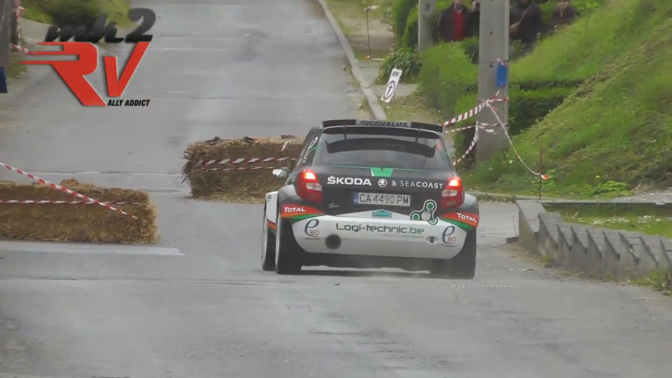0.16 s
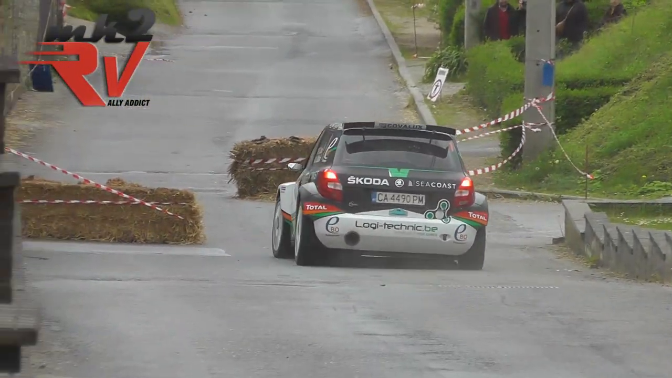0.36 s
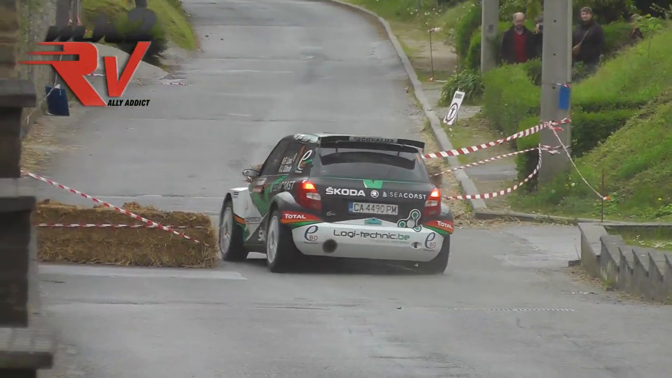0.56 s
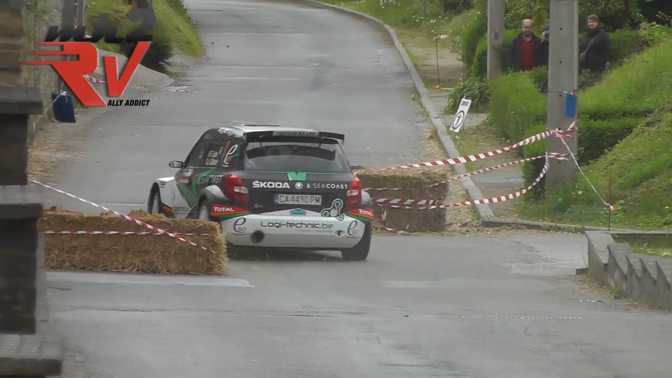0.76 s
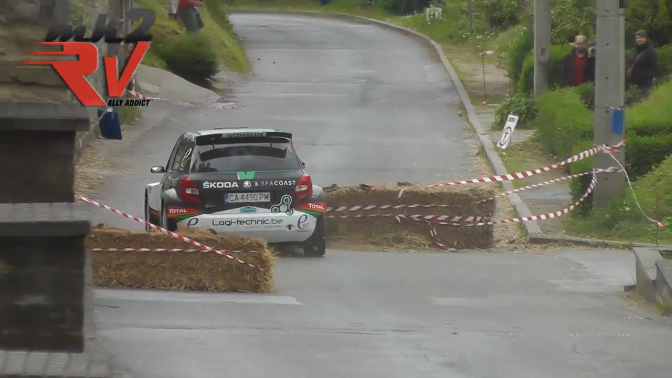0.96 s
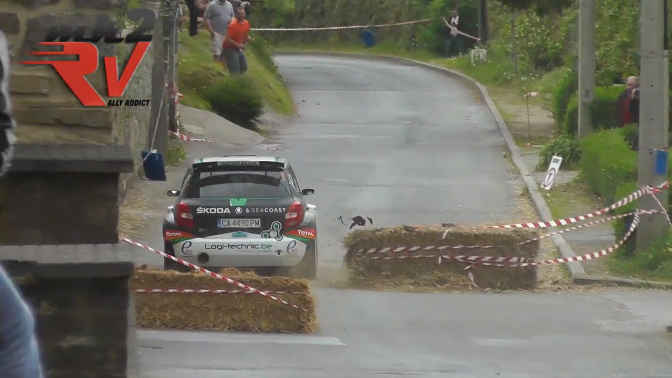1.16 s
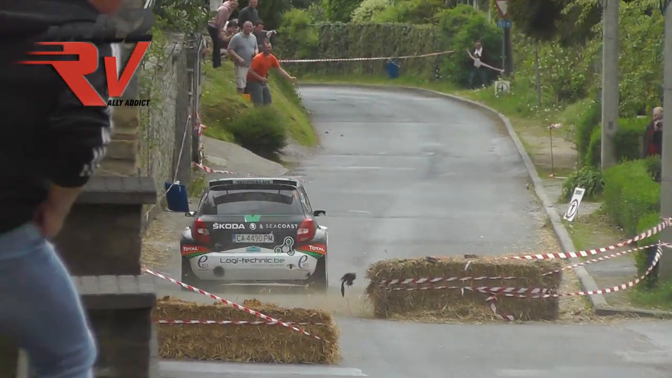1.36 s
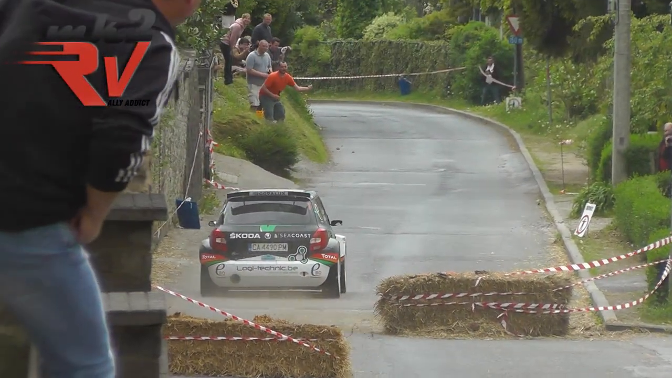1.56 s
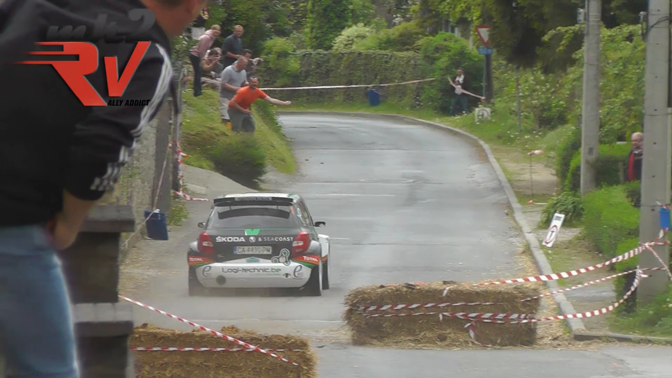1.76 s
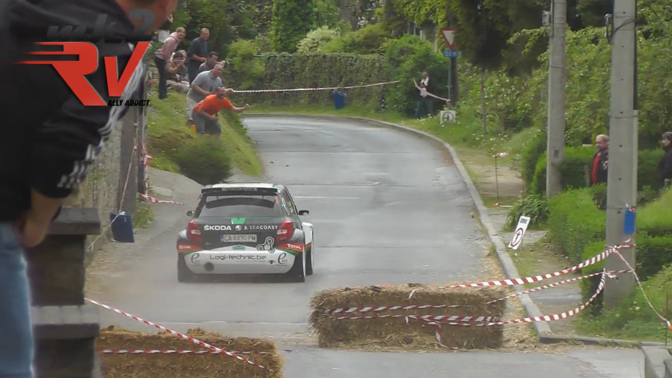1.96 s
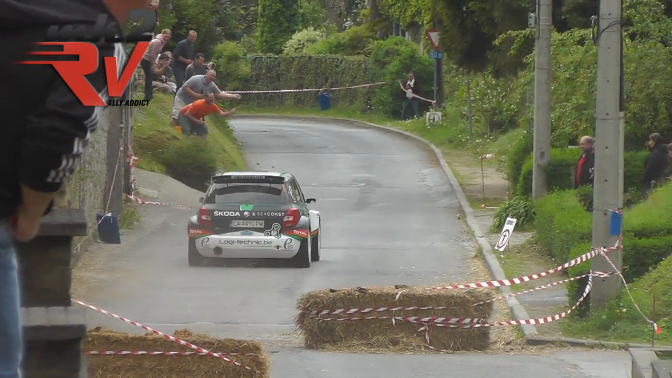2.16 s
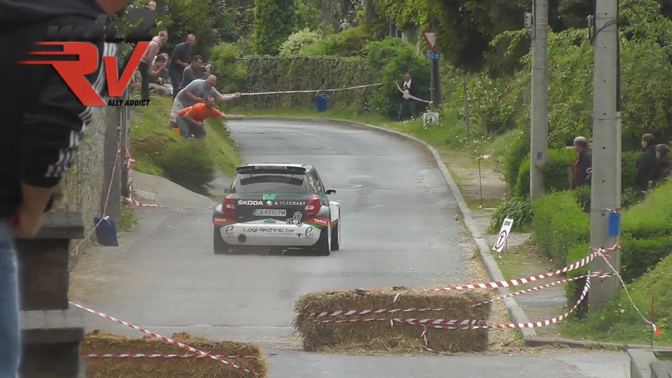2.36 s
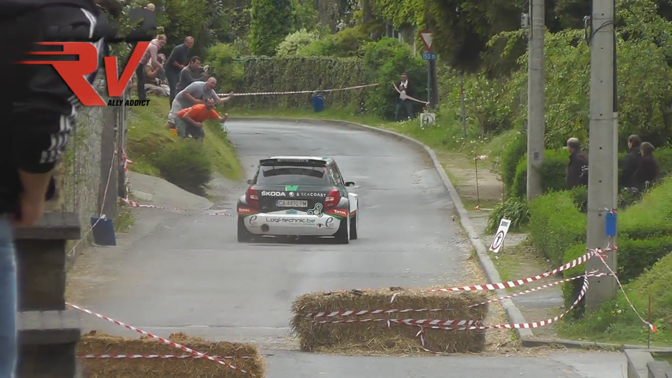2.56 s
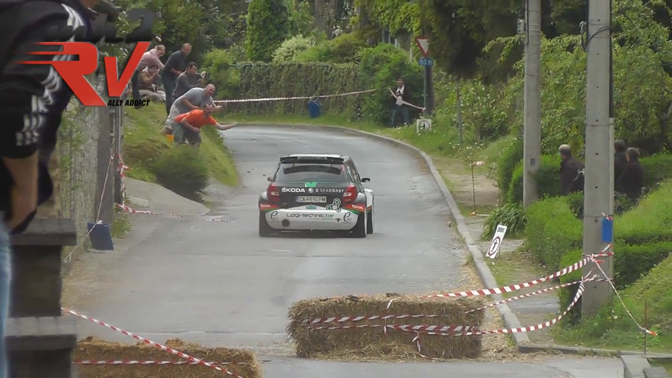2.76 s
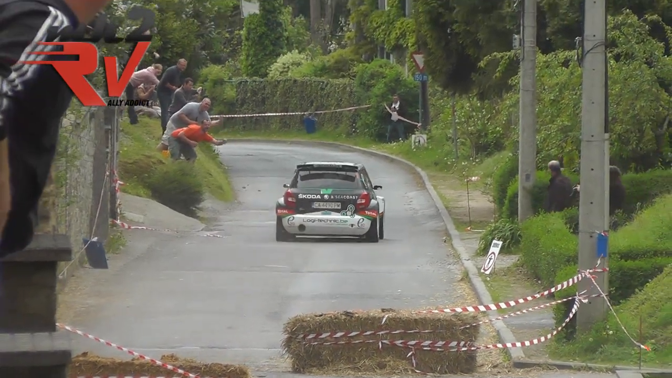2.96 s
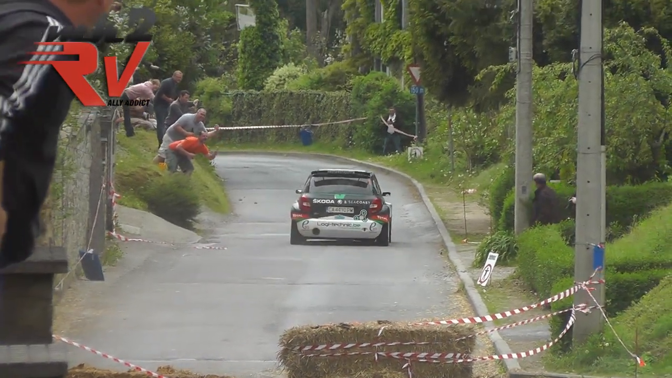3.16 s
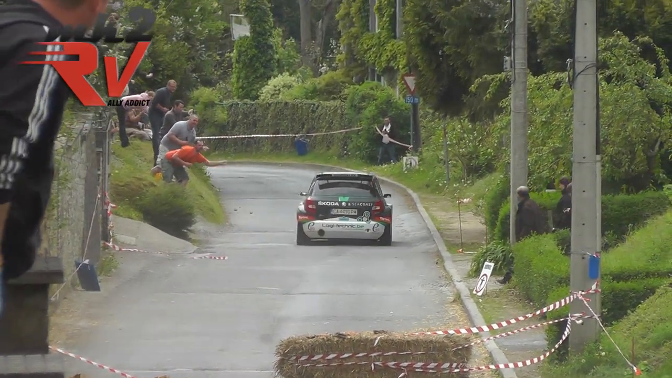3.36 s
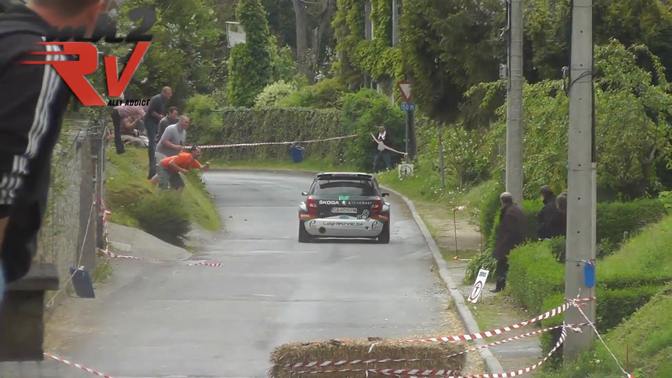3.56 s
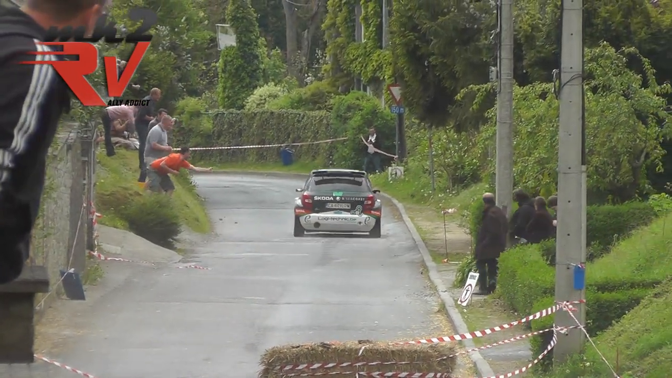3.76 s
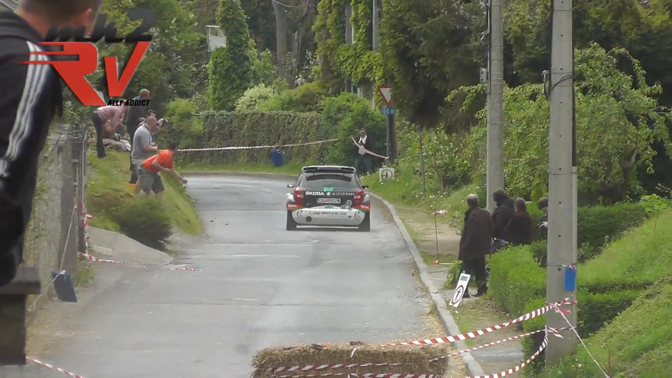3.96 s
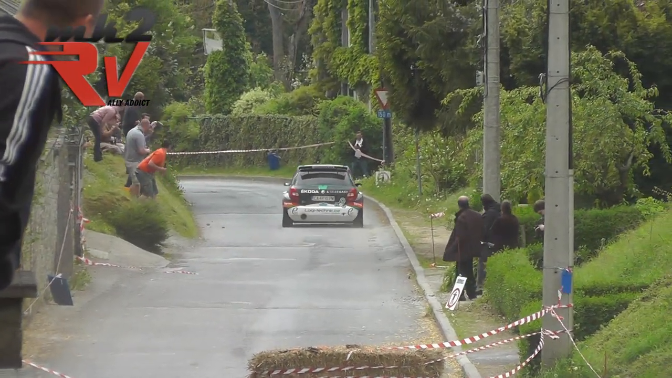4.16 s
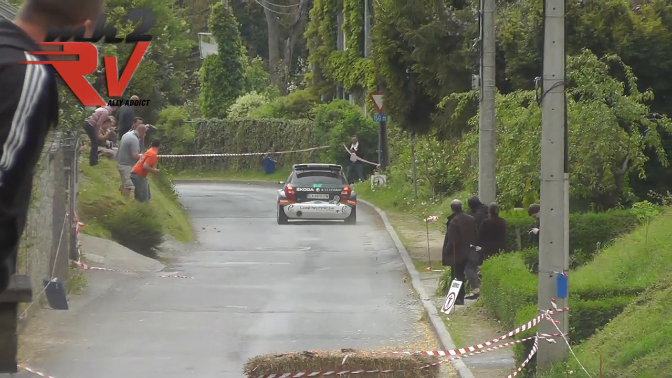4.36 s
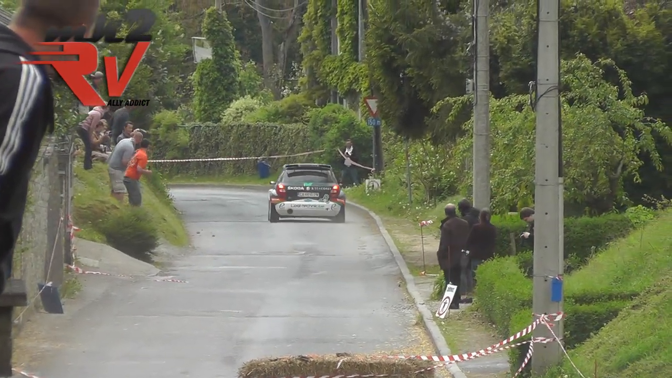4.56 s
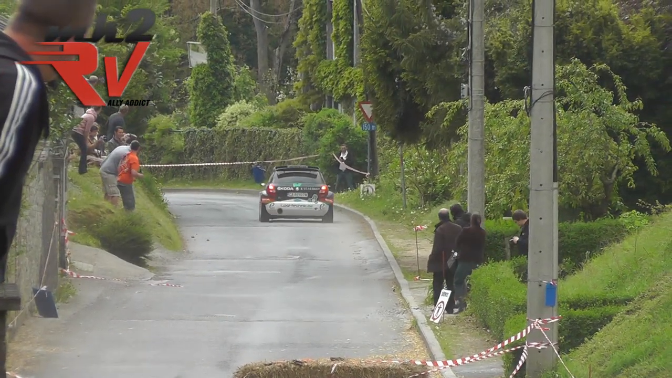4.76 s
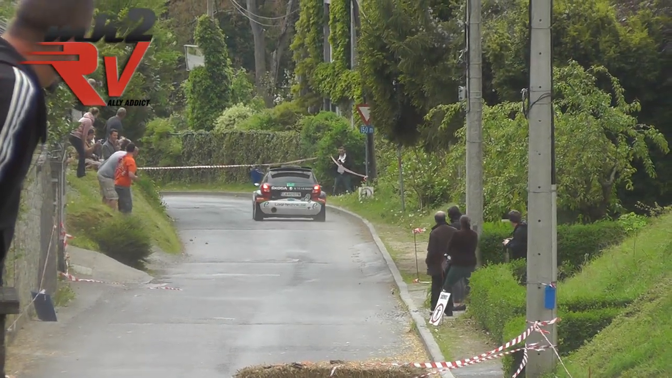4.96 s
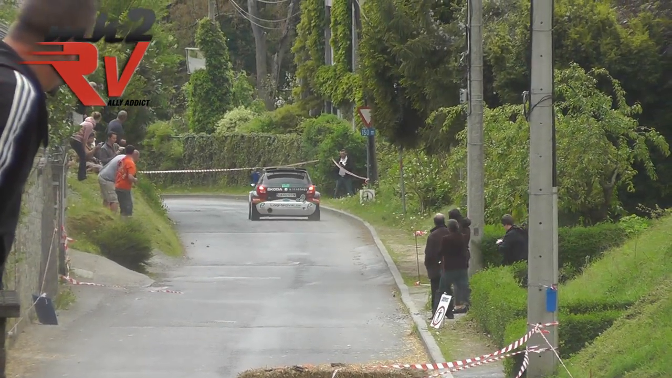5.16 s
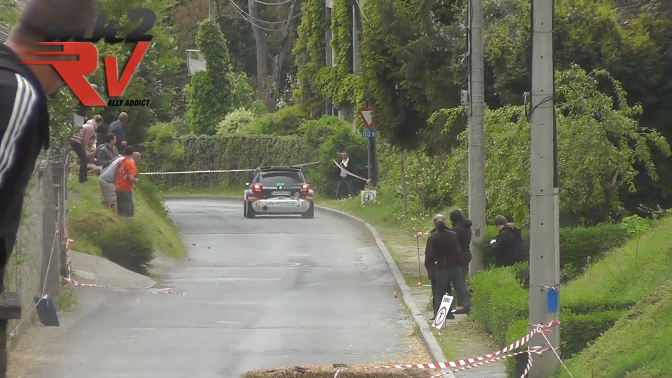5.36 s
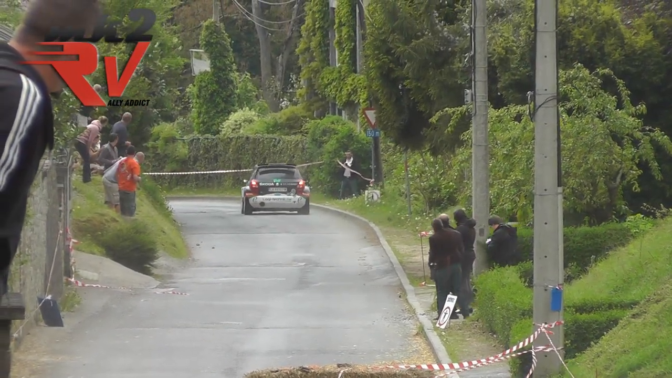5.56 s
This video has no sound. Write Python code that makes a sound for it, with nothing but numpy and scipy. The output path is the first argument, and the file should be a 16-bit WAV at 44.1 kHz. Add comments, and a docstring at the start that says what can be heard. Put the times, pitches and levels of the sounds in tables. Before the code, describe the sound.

Loud, buzzing four-cylinder exhaust, heard outdoors from the roadside in close stereo. First uneven, burbling notes with deep pops as the car weaves between barriers, then a hard stuttering pull. The tone rises smoothly, breaks in a cluster of bangs at a gear change, drops and rises again. Another popping shift follows, then it fades at the end with a sagging pitch. Faint wind rumble and short scattered reflections surround it.

```python
"""A four-cylinder rally car threads a chicane and drives off up a lane at full throttle, heard from the roadside.
Sines at the firing orders make the exhaust note; noise puffed once a firing makes the rough roar.
Tabled ignition cuts stutter both; struck pipe modes and gas bursts make thumps and cracks.
Random sparse echoes stand for walls and banks; grit ticks underneath and wind buffets the microphone."""
import sys
import numpy as np
from scipy import signal
from scipy.fft import rfft, irfft, next_fast_len
from scipy.io import wavfile
from scipy.ndimage import uniform_filter1d

SR = 44100
rng = np.random.default_rng(int(sys.argv[2]) if len(sys.argv) > 2 else 0)


def unload_wav(signal):
    """Save mono or channel-first audio to the path in sys.argv[1] as 16-bit WAV at rate SR, clipped to [-1, 1]."""
    wavfile.write(
        sys.argv[1],
        SR,
        np.round(np.clip(np.atleast_2d(signal).T, -1, 1) * 32767).astype(np.int16),
    )


N = 247401

# Port level difference. Each row: frequency in Hz, left over right in dB.
PORT_LEAN = [(60, -1.5), (160, -1.1), (250, -1.2), (400, -1), (650, 2.5), (1050, 2.5), (1680, 0.3),
             (2710, 0)]
# Port phase difference. Each row: frequency in Hz, left lead in radians.
PORT_LEAD = [(0, 0), (340, -0.32), (600, 0.33), (1120, -1.04), (1380, -0.18), (1640, -0.39), (2150, 0.049),
             (2410, 0.21), (2840, 0.014)]
# Car position. Each row: time in seconds, left over right in dB.
PAN = [(0, 0), (1, 0), (2, 0.8), (3.7, 1.5), (4.6, -0.8), (5.61, -0.5)]
# Likeness of the sides. Each row: frequency in Hz, left-right likeness from 0 to 1.
LIKENESS = [(60, 0.93), (160, 0.99), (260, 0.997), (380, .98), (530, 0.84), (910, 0.83), (1570, 0.74),
            (2710, 0.86), (4500, .99), (7200, .99), (8500, 0.6)]
# Echo decay. Each row: frequency in Hz, t60 in seconds.
LANE_DECAY = [(100, 0.7), (1000, 0.29), (8000, 0.32)]

# Grit on the underbody. Each row: time in seconds, peak in dB.
KNOCKS = [(0.789, -16), (.893, -10)]
# Panel modes. Each row: nominal frequency in Hz, relative level in dB, t60 in seconds.
PANEL_MODES = [(1280, -5, 0.03), (2335, -1, 0.016), (2810, -5, 0.016)]

# Unburnt charges going off in the pipe. Each row: time in seconds, peaks in dB of thump, dull clack, sharp snap.
POPS = [(0.032, -8.5, -27.5, -73), (0.111, -7, -25, -56), (0.221, -13.5, -14.5, -49),
        (0.291, -7.5, -42, -53), (0.327, -5.5, -13.5, -47), (0.895, -8.5, -18, -56),
        (0.969, -15, -20.5, -48), (1.116, -2, -24.5, -59), (2.33, -9, -26, -54), (2.346, -5, -30.5, -58),
        (2.371, -9.5, -29.5, -58), (2.382, -3, -20.5, -47), (2.387, -8.5, -23, -28),
        (2.419, -9.5, -32, -54), (2.463, -12.5, -29, -65), (4.209, -10, -13, -65), (4.268, -10, -35, -56),
        (4.32, -14.5, -32, -57.5), (4.383, -10.5, -35.5, -61), (4.433, -4.5, -26.5, -60),
        (4.441, -5.5, -16.5, -32), (4.489, -12.5, -29.5, -61), (5.425, -16, -21.5, -60)]
# Pipe modes. Each row: nominal frequency in Hz, relative level in dB, t60 in seconds.
PIPE_MODES = [(125.3, 5, 0.039), (167, -4.5, 0.11), (341.2, 3, 0.063), (770, -8, 0.0099),
              (1010, -5.5, 0.0047)]
# Spectra of the gas bursts. Each row: frequency in Hz, relative density in dB per Hz.
CLACK_COLOUR = [(400, -33), (900, 6), (1500, -7.5), (3000, -10), (6000, -52.5)]
SNAP_COLOUR = [(2000, -35.5), (4500, 3), (7000, -6), (11000, -23.5), (16000, -16.5)]
CLACK_PEAK_S, SNAP_FADE_S = .003, .0012

# Raspy ring as the tailpipe swings to face back. Each row: time in seconds, pitch in Hz, rms in dB.
RASP_RING = [(3.6, 1714, -52.5), (3.8, 1820, -35.5), (4, 1750, -56), (4.16, 1809, -32.5),
             (4.55, 1732, -53.5), (4.85, 1930, -28.5), (4.95, 1875, -40), (5.1, 1890, -34),
             (5.3, 1910, -55)]

# Gas noise effort. Each row: time in seconds, reference level in dB.
EFFORT = [(0, -35), (.14, -33.5), (.24, -28), (.52, -34.5), (.72, -32), (1.05, -33.5), (1.17, -39),
          (1.29, -35.5), (1.55, -36.5), (2.08, -32), (2.2, -34), (2.38, -32.5), (2.47, -40), (2.54, -35.5),
          (2.85, -32.5), (3.46, -32), (3.62, -35), (3.76, -26.5), (4.2, -27), (4.44, -30.5), (4.54, -36),
          (4.77, -26.5), (5.24, -25), (5.32, -30), (5.44, -26.5), (5.55, -32), (5.607, -36)]
# Dulling as the car turns and draws away. Each row: time in seconds, treble change in dB, taken in part by each layer.
TREBLE = [(0, 0.5), (.3, -3.5), (1.25, 4), (2.35, -3), (2.55, -5.5), (3.2, -7), (3.6, -5.5), (3.8, -14.5),
          (4.5, -9.5), (4.8, -14.5), (5.607, -18.5)]
# Roar, snarl, rasp, hiss. Each row: dB over the usual effort, share of its swings, share of the dulling.
ROAR_LAYERS = [(10.5, 0.54, 0.31), (1, 0.79, 0.24), (-7, .9, 0.43), (-14, 0.71, 0.99)]
# Spectra of the four layers. Each row: frequency in Hz, relative density in dB per Hz.
ROAR_COLOUR = [(18, -91.5), (30, -43.5), (188, -20.5), (207, -42.5), (230, 0.5), (252, -12), (295, -20.5),
               (420, -18.5), (475, -19.5), (572, -25.5), (699, -18), (909, -13), (1200, -29.5),
               (1560, -52.5), (2640, -120)]
SNARL_COLOUR = [(850, -26), (1150, 3.5), (1450, 7), (1600, 2.5), (1850, 3), (2150, 0), (2400, -6.5),
                (3200, -56)]
RASP_COLOUR = [(1800, -30.5), (2700, 6), (3600, 1), (4300, -4.5), (5200, -14.5), (7000, -53.5)]
HISS_COLOUR = [(3800, -23.5), (5200, 1.5), (7000, 3), (8500, -10), (10500, -19.5), (12000, -26),
               (16000, -34)]
USUAL_EFFORT_DB = -33
STUTTER_DB_PER_DB, STUTTER_S = 1.5, 0.086  # roar swell per dB of cut, averaging time

# Firing tone. Each row: time in seconds, firing rate in Hz, rms in dB.
FIRING = [(0.0, 209, -11.5), (.04, 205.6, -17.5), (.1, 199.6, -10), (.14, 212.8, -18), (.18, 195.2, -7),
          (.23, 222.2, -17), (.29, 201.3, -13.5), (.37, 223, -30), (.41, 234.6, -11), (.5, 236.1, -8.5),
          (.76, 212, -18), (.85, 214, -17), (.93, 206.2, -14.5), (1.0, 241.2, -4), (1.035, 246.8, -10.5),
          (1.07, 224.2, -4.5), (1.14, 195.3, -13), (1.21, 212, -7.5), (1.25, 235.5, -6.5),
          (1.75, 240.9, -6.5), (1.82, 243.7, -12.5), (2.06, 249.9, -4.5), (2.26, 256.6, -9),
          (2.35, 259.4, -16), (2.42, 240, -11), (2.47, 201.2, -17), (2.5, 211.6, -13.5), (2.535, 213, -7),
          (2.6, 214.7, -10), (2.95, 223.9, -9.5), (3.55, 239.4, -9.5), (3.85, 245.8, -13.5),
          (4.2, 253.6, -12), (4.37, 254.6, -15.5), (4.435, 253.4, -11.5), (4.47, 244.9, -17.5),
          (4.54, 204.2, -18.5), (4.6, 212.4, -15), (4.88, 216.1, -8.5), (5.255, 217.7, -11),
          (5.29, 213.5, -19), (5.39, 222.3, -26), (5.415, 235.4, -14.5), (5.44, 214.5, -14),
          (5.465, 202.3, -16.5), (5.505, 195, -18), (5.53, 187.1, -25.5), (5.607, 185.4, -30.5)]
# Other orders, before pipe colour. Each row: time in seconds, rms in dB of the half orders from
# uneven cylinders, of order 2, of order 3, of orders 4 and 5.
ORDER_LEVELS = [(0, -14, -42, -18, -38), (.12, -27, -26, -40, -30), (.23, -23.5, -31, -20, -26),
                (.3, -16, -31, -31, -30), (.45, -14.5, -36, -40, -36), (.6, -19, -29, -38, -40),
                (.85, -35, -28, -25, -38), (.97, -15, -29, -27, -34), (1.04, -31, -33, -19, -28),
                (1.15, -21.5, -30, -36, -42), (1.26, -26.5, -36, -26, -40), (1.35, -31, -31, -32, -30),
                (1.55, -34, -27, -32, -36), (1.7, -34, -29, -24, -31), (1.76, -36.5, -24, -26, -34),
                (1.84, -42.5, -38, -27, -36), (1.92, -36, -26, -22, -27), (2.05, -41.5, -34, -29, -36),
                (2.2, -40, -35, -25, -34), (2.35, -37, -38, -19, -38), (2.42, -29.5, -27, -27, -31),
                (2.6, -32.5, -33, -23, -20), (2.8, -37.5, -23, -23, -22), (3.4, -33, -25, -25, -22),
                (3.8, -36.5, -28, -24, -23), (4.1, -41, -30, -23, -25), (4.23, -39.5, -34, -21, -31),
                (4.42, -38, -32, -20, -35), (4.48, -26, -27, -36, -45), (4.68, -39, -25, -29, -26),
                (4.9, -36.5, -32, -28, -29), (5.08, -35.5, -33, -20, -29), (5.25, -31, -22, -18, -28),
                (5.3, -29, -25, -41, -36), (5.38, -34, -37, -36, -45), (5.44, -38.5, -23, -22, -22),
                (5.53, -40, -28, -46, -34), (5.607, -45, -31, -34, -30)]
# Order 0.5 against order 1.5. Each row: time in seconds, level in dB.
LOWEST = [(0, 2), (.12, -8), (.31, 6), (.56, -16), (.85, -11.5), (.97, -2), (1.4, 4), (2.1, 9.5),
          (2.42, -0.5), (2.799, -17), (3.6, 1.5), (4.2, 4), (4.5, -5.5), (5.607, -10)]
# Side lines from uneven cylinders and top firing orders: multiples of the firing rate.
FAINT_ORDERS = [3.25, 3.5, 3.75, 4.25, 4.5, 6, 7]
# Their levels in dB against orders 4 and 5.
FAINT_DB = [-17, -21, -14.5, -13.5, -12.5, -4.5, 0]
# Pitches the pipe favours. Each row: frequency in Hz, gain in dB.
ORDER_COLOUR = [(110, -6.5), (300, 0), (370, 0), (420, 0.5), (470, 0.5), (520, -6.5), (630, -0.5),
                (700, -0.5), (780, 5.5), (880, 0), (980, 0.5), (1090, -5), (1250, -24), (1560, -18),
                (1800, -24.5)]
FADING_RMS_DB, FADING_HZ = 1.6, 4  # swell and sink by echoes along the lane

# Ignition cuts. Each row: centre in seconds, length in seconds, nominal depth in dB.
CUTS = [(.263, .014, 8.5), (0.977, .014, 6.5), (1.14, .024, 14), (1.176, 0.014, 12), (1.208, .012, 8.5),
        (2.337, .012, 4.5), (2.367, .012, 7.5), (2.395, 0.022, 14), (2.427, .012, 6.5), (4.209, 0.011, 6),
        (4.271, 0.013, 11), (4.322, .016, 8.5), (4.385, .02, 17), (4.424, .01, 15), (4.456, .014, 33),
        (5.523, .025, 9)]
# Driveline rebound as a gear bites. Each row: start in seconds, initial swing of the firing rate in Hz.
SHUNTS = [(1.247, 23.3), (1.56, 8), (2.501, 10.45), (4.577, 7.4)]
SHUNT_HZ, SHUNT_FADE_S = 8.63, 0.13

PORT_SIDES = np.array([[.5], [-.5]])  # left, right share of a difference
BAND_EDGE_HZ = 15700


def gain_of(db):
    """Decibels to gain."""
    return 10 ** (np.asarray(db) / 20)


def evened(x):
    """Scales to rms 1."""
    return x / np.sqrt(np.mean(x ** 2) + 1e-20)


def read(points, hz):
    """Reads a spectrum on a log-frequency axis."""
    point_hz, value = np.transpose(points)
    return np.interp(np.log(hz + 1), np.log(point_hz + 1), value)


def along(rows):
    """Each column of a time table, sample by sample."""
    row_s, *columns = np.transpose(rows)
    return [np.interp(np.arange(N) / SR, row_s, column) for column in columns]


def shaped(x, response):
    """Filters by a response given as a function of frequency."""
    size = next_fast_len(N)
    return irfft(rfft(x, size) * response(np.fft.rfftfreq(size, 1 / SR)), size)[..., :N]


def wander(hz):
    """Low-passed noise of rms 1, at half amplitude at hz."""
    return evened(shaped(rng.standard_normal(N), lambda f: 1 / (1 + (f / hz) ** 2)))


def ring(modes, t, chance, rise_s, spread):
    """One blow on a set of decaying modes, each a little off its pitch; peak 1."""
    x = 0
    for (hz, db, t60_s), c in zip(modes, chance):
        actual_hz = hz * (1 + spread * (c - .5))
        x = x + gain_of(db - 60 * t / t60_s) * np.sin(2 * np.pi * actual_hz * t + 2 * np.pi * c * 7)
    x = x * (1 - np.exp(-t / rise_s))
    return x / abs(x).max()


def wind():
    """Lumpy low noise that dies down, unrelated at the two ports."""
    air = shaped(rng.standard_normal((2, N)), lambda f: f / (f + 60) / (1 + (f / 150) ** 2))
    gust_db = 4.5 * wander(hz=6)
    fade_db = -2.6 * np.arange(N) / SR
    return gain_of(-49.5 + fade_db + gust_db) * evened(air)


def lane(x):
    """Sparse echoes of random sign, other ones for each side, each band dying at its own speed."""
    taps = np.zeros((2, SR // 2))
    # One tap in every 20 samples, at a random place.
    at = np.arange(300, SR // 2 - 20, 20) + rng.integers(0, 20, (2, (SR // 2 - 301) // 20))
    np.put_along_axis(taps, at, rng.choice([-1., 1.], at.shape), 1)
    hz, t, bands = signal.stft(taps, SR, nperseg=256)
    decay = gain_of(-60 * t / read(LANE_DECAY, hz)[:, None])
    tail = signal.istft(bands * decay, SR, nperseg=256)[1]
    return signal.fftconvolve(x[None], tail / np.linalg.norm(tail[0]), axes=1)[:, :N]


def knocks():
    """Grit strikes sheet metal: two short dull ticks of panel modes."""
    out, t = np.zeros(N), np.arange(SR // 20) / SR
    chance = rng.random((len(KNOCKS), len(PANEL_MODES)))
    for (s, db), c in zip(KNOCKS, chance):
        start = round((s - .004) * SR)
        out[start:start + len(t)] += gain_of(db) * ring(PANEL_MODES, t, c, rise_s=.002, spread=.06)
    return out


def pops():
    """Each pop rings the pipe low and spits a short burst of gas, dull and sharp."""
    out, t = np.zeros(N + SR), np.arange(SR // 5) / SR
    chance = rng.random((len(POPS), len(PIPE_MODES)))
    burst = t / CLACK_PEAK_S * np.exp(1 - t / CLACK_PEAK_S)
    gas = rng.standard_normal((len(POPS), len(t))) * burst
    hz = np.fft.rfftfreq(len(t), 1 / SR)
    for (s, thump_db, clack_db, snap_db), c, g in zip(POPS, chance, gas):
        clack = irfft(rfft(g) * gain_of(read(CLACK_COLOUR, hz)), len(t))
        snap = irfft(rfft(g) * gain_of(read(SNAP_COLOUR, hz)), len(t))
        snap = snap * np.exp(-abs(t - .005) / SNAP_FADE_S)
        crack = gain_of(clack_db) * clack / abs(clack).max() + gain_of(snap_db) * snap / abs(snap).max()
        thump = gain_of(thump_db) * ring(PIPE_MODES, t, c, rise_s=0.0068, spread=0.14)
        start = round((s - .005) * SR)
        out[start:start + len(t)] += thump + crack
    return out[:N]


def rasp_ring():
    """A narrow band of noise carried up to the ring's pitch."""
    hz, db = along(RASP_RING)
    return np.sqrt(2) * gain_of(db) * wander(hz=90) * np.cos(2 * np.pi * np.cumsum(hz) / SR)


def roar(turns, burn):
    """Gas noise leaves the pipe in one puff a firing, each puff of its own size."""
    size = gain_of(0.18 * rng.standard_normal(N)[turns.astype(int)])
    puffs = (2.6 + np.exp(-(turns % 1) / .5)) * size * rng.standard_normal(N)
    swing_db = along(EFFORT)[0] - USUAL_EFFORT_DB
    dull_db = along(TREBLE)[0]
    levels_db = [USUAL_EFFORT_DB + over_db + swing_share * swing_db + dull_share * dull_db
                 for over_db, swing_share, dull_share in ROAR_LAYERS]
    mean_burn_db = uniform_filter1d(20 * np.log10(burn), size=round(STUTTER_S * SR))
    levels_db[0] = levels_db[0] - STUTTER_DB_PER_DB * mean_burn_db
    gust_db = 0.85 * wander(hz=8.2)  # shared by the layers
    out = 0
    for db, colour in zip(levels_db, [ROAR_COLOUR, SNARL_COLOUR, RASP_COLOUR, HISS_COLOUR]):
        layer = evened(shaped(puffs, lambda f: gain_of(read(colour, f))))
        out = out + gain_of(db + gust_db + 1.14 * wander(hz=27)) * layer
    return out


def note(hz, first_db, burn):
    """Firing orders as sines; the higher ones waver more along the lane and drop deeper in each cut."""
    half_db, second_db, third_db, high_db = along(ORDER_LEVELS)
    lowest_db = half_db + along(LOWEST)[0]
    orders = [1, .5, 1.5, 2, 3, 4, 5, *FAINT_ORDERS]
    levels_db = [first_db, lowest_db, half_db, second_db, third_db, high_db, high_db]
    levels_db += [high_db + db for db in FAINT_DB]
    turns = np.cumsum(hz) / SR
    out = 0
    for k, db in zip(orders, levels_db):
        phase = 2 * np.pi * (k * turns + rng.random()) + 0.13 * k * wander(hz=28.8)
        cut = burn ** (.55 + .3 * k)
        waver_db = .8 * np.sqrt(k) * wander(hz=22)
        # The firing tone itself takes no pipe colour or fading.
        pipe_db = (k != 1) * (read(ORDER_COLOUR, k * hz) + FADING_RMS_DB * wander(FADING_HZ))
        out = out + np.sqrt(2) * gain_of(db + pipe_db + waver_db) * cut * np.cos(phase)
    return out


def ignition():
    """Gain of the burn: each cut is a soft-edged hole."""
    t = np.arange(N) / SR
    return gain_of(-sum(db * np.exp(-(2 * (t - s) / length_s) ** 4) for s, length_s, db in CUTS))


def shunt():
    """The driveline winds up and rebounds: a dying swing of the firing rate in Hz."""
    start_s, swing_hz = np.transpose(SHUNTS)
    since_s = np.maximum(np.arange(N) / SR - start_s[:, None], 0)
    return swing_hz @ (np.exp(-since_s / SHUNT_FADE_S) * np.sin(2 * np.pi * SHUNT_HZ * since_s))


def scene():
    """The car straight on, plus its scattered sound, which fills the share that differs between the sides."""
    hz, first_db = along(FIRING)
    hz = uniform_filter1d(hz, size=SR // 50) + shunt()
    burn = ignition()
    exhaust = note(hz, first_db, burn)
    gas = burn ** 0.24 * (roar(np.cumsum(hz) / SR, burn) + rasp_ring())
    car = exhaust + gas + pops() + knocks()
    scattered = shaped(lane(car), lambda f: np.sqrt(1 - np.clip(read(LIKENESS, f), 0, .999)))
    return (car + scattered) * gain_of(PORT_SIDES * along(PAN)[0])


def record(dry):
    """Two close ports differ in level and phase, hiss and catch wind; bass cut, soft overload, band limit."""
    def port_response(f):
        bass_cut = 1 / np.sqrt(1 + (70 / (f + 1)) ** 6)
        return gain_of(PORT_SIDES * read(PORT_LEAN, f)) * np.exp(1j * PORT_SIDES * read(PORT_LEAD, f)) * bass_cut

    hiss = gain_of(-82.0) * rng.standard_normal(dry.shape)
    ports = shaped(dry, port_response) + wind() + hiss
    held = ports / (1 + abs(ports) ** 8) ** (1 / 8)
    low_pass = signal.firwin(1023, BAND_EDGE_HZ, window=("kaiser", 9), fs=SR)
    return signal.oaconvolve(held, low_pass[None], "same")


dry = scene()
out = record(dry)
unload_wav(out)
```